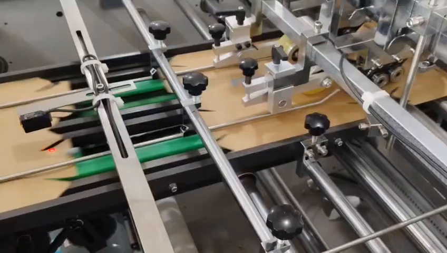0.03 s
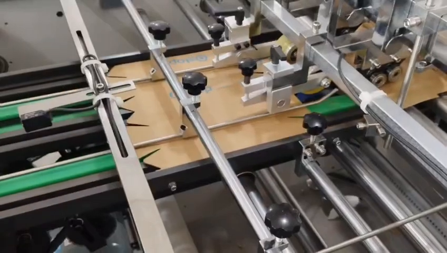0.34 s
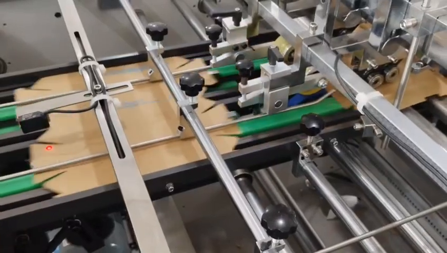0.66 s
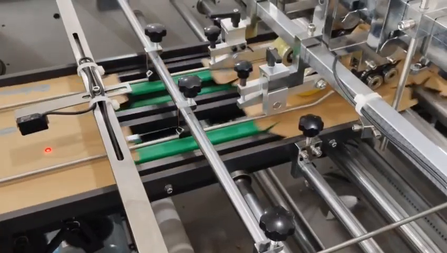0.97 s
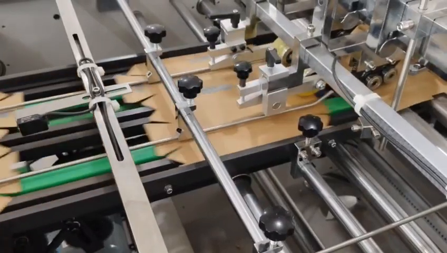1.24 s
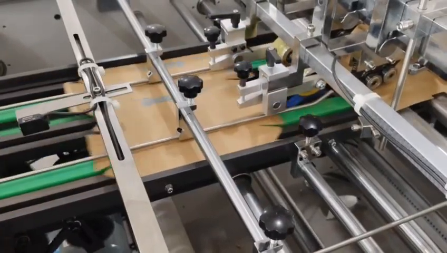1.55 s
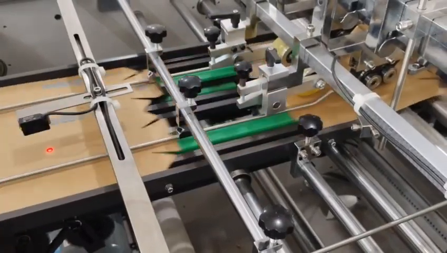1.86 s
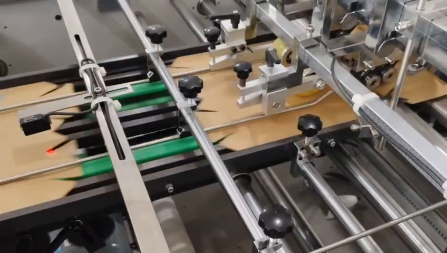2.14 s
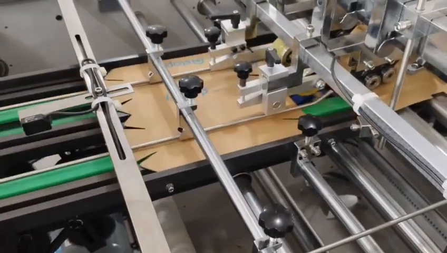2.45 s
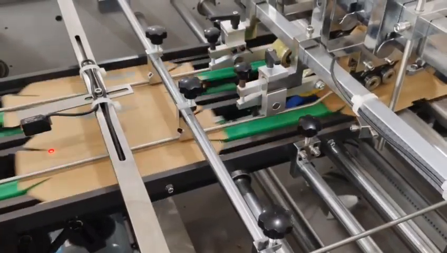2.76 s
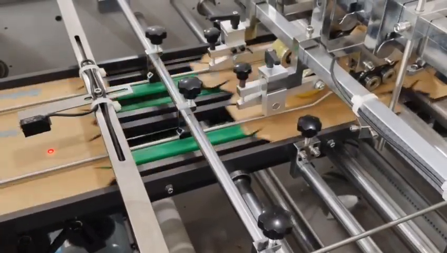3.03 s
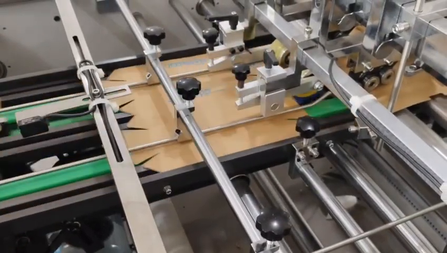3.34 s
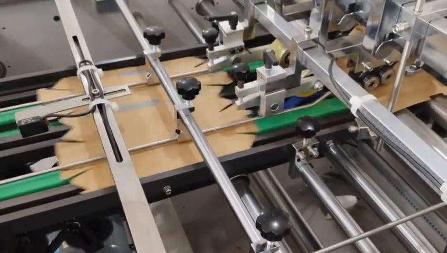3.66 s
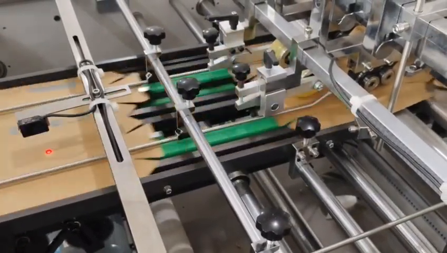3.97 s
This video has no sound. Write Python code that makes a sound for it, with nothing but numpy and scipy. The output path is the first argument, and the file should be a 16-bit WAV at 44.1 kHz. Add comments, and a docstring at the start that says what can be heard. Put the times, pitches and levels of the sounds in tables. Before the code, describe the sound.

Heard up close in a factory, a cardboard folding machine hums, rattles and whines. Four sheets pass a second apart, each with a hiss, a sharp slap, a scrape, then rumbling knocks and a snap, sometimes squeaking faintly.

```python
"""A folder-gluer pulls one cardboard blank a second along its belts, close by in a factory hall.
Each blank hisses along the guides, slaps the folding rails and scrapes clear. It rumbles through the
rollers with knocks, thumps and the odd stick-slip squeak, and its tail snaps off the feed belt.
Motors hum, belts and loose fittings rattle and the drive whines throughout."""
import sys
import numpy as np
from scipy import signal
from scipy.fft import rfft, irfft
from scipy.io import wavfile
from scipy.ndimage import uniform_filter1d

SR = 44100
rng = np.random.default_rng(int(sys.argv[2]) if len(sys.argv) > 2 else 0)


def output_pcm(signal):
    """Save a mono or channel-first signal as 16-bit PCM at the path in sys.argv[1].

    Samples are clipped to [-1, 1] before scaling.
    """
    pcm = np.clip(np.atleast_2d(signal).T, -1, 1) * 32767
    wavfile.write(sys.argv[1], SR, np.round(pcm).astype(np.int16))


N = 176400

# motor tones: pitch_hz, level_db
MOTOR_HUM = [(50, -45.5), (224, -44), (646, -49)]
# drive whine over time: time_s, level_db
WHINE_LEVELS = [(.25, -43), (.35, -41), (.45, -46), (1.0, -47), (1.7, -47), (2.2, -53.5), (3.0, -55),
                (4.0, -57)]
# buzzing fittings: centre_hz, width_hz, level_db
BUZZ_BANDS = [(2650, 340, -47.5), (4200, 340, -57)]
# rail and frame modes: pitch_hz, t60_s, level_db
FRAME_MODES = [(280, .12, -4), (646, .25, -8), (1360, .25, -8), (1980, .15, -4), (2163, .15, -6),
               (2293, .18, -5), (2618, .35, -1), (2720, .2, -2), (2805, .28, -3), (3335, .25, -9),
               (3757, .3, -7), (4060, .2, -5), (5502, .2, -17), (6534, .3, -14)]
# blank hits the folding rails: start_s, level_db, decay_s, guide_hz, guide_db
RAIL_SLAPS = [(.3738, -1.3, .013, 2200, -4), (1.3958, .2, .014, 2400, -5), (2.4167, .2, .016, 3950, 0),
              (3.4376, .3, .011, 3900, -1)]
# flaps flick around each slap: start_s, level_db
FLAP_FLICKS = [(.27, -24), (.31, -22), (.351, -14), (.3565, -7), (.383, -6), (.3994, -5.5), (.409, -9.5),
               (1.3775, -8.5), (1.389, -12), (1.413, -8), (2.400, -12), (2.409, -14), (2.431, -7),
               (2.449, -10), (2.4644, -11), (3.4146, -15), (3.423, -15), (3.442, -5), (3.473, -12)]
# card knocks under the rollers: start_s, level_db
ROLLER_KNOCKS = [(.648, -2), (.708, -3), (.808, 0), (.985, -8), (1.066, -4), (1.575, -6), (1.615, -7),
                 (1.677, 1), (1.722, -1), (1.828, -2), (1.875, -5), (1.998, -5), (2.678, 0), (2.73, -2),
                 (2.848, 0), (2.872, -4), (3.756, -3), (3.775, -4), (3.872, -3), (3.955, -6)]
# hollow thumps of sheet and belts: start_s, length_s, pitch_hz, level_db
SHEET_THUMPS = [(.77, .04, 235, -24.5), (.85, .03, 165, -32), (.95, .07, 50, -32), (1.675, .025, 370, -31),
                (1.815, .035, 200, -29), (2.76, .1, 222, -28), (3.825, .03, 235, -33)]
# tail leaves the feed belt: start_s, level_db
TAIL_SNAPS = [(.803, -2), (1.822, 1), (2.843, 0), (3.866, -2)]
# card squeaks on a guide: start_s, length_s, pitch_hz, level_db
GUIDE_SQUEAKS = [(1.715, .015, 4560, -41), (1.815, .012, 4560, -40), (2.668, .02, 2050, -35),
                 (2.725, .018, 2200, -35), (2.725, .06, 4549, -43.5), (2.785, .05, 4549, -41.5),
                 (3.747, .022, 2202, -27.5), (3.768, .016, 3758, -37), (3.79, .032, 4549, -35),
                 (3.835, .055, 4549, -43), (3.868, .016, 2900, -35)]

# spectra of the sources and the hall: frequency_hz, gain_db
BELT_SPECTRUM = [(20, -14), (33, -7), (48, -2), (65, -6), (95, -6), (135, -4), (220, -6), (330, -10.5),
                 (650, -13.5), (1000, -18), (1500, -20.5), (2200, -20), (2700, -20), (3200, -24),
                 (4100, -23.5), (5000, -26.5), (6800, -26.5), (8000, -30), (9800, -44), (12000, -33)]
HISS_SPECTRUM = [(250, -2), (900, 0), (1500, -3), (2400, -2), (4000, -2), (6500, 0), (8500, -3),
                 (10000, -8), (12000, -2)]
SCRAPE_SPECTRUM = [(200, -15), (800, -4), (1500, -4), (2600, 2), (3300, -4), (4800, -5), (6600, -2),
                   (8000, -10), (9500, -20), (12000, -12)]
RUB_SPECTRUM = [(200, -8), (600, 0), (1000, 0), (1400, -3), (2100, 1), (3100, -5), (4000, -2), (5000, -9),
                (7000, -17), (10000, -32)]
FLEX_SPECTRUM = [(100, -22), (220, -8), (350, -1), (650, 0), (950, -2), (1400, -10), (3000, -22),
                 (8000, -40)]
RUMBLE_SPECTRUM = [(30, -17), (70, -4), (110, -1), (230, 1.5), (400, -4), (700, -5.5), (1300, -12),
                   (2000, -14), (2800, -17), (4500, -25), (7000, -30), (12000, -42)]
SLAP_SPECTRUM = [(60, -25), (150, -14), (260, 0), (450, 1), (700, .5), (1000, -1.5), (1400, -4.5),
                 (2150, 2), (2750, 1), (3200, -5), (4100, -1), (5000, -11), (7000, -13), (9000, -32),
                 (12000, -31)]
KNOCK_SPECTRUM = [(100, -20), (300, -5), (700, -1), (1400, -3), (2000, 3), (2700, 0), (3100, -5), (4000, 0),
                  (5000, -10), (7000, -17), (10000, -32)]
SNAP_SPECTRUM = [(300, -12), (900, 0), (1500, 1), (2900, 0), (4500, -5), (7000, -4), (10000, -4),
                 (12000, -4)]
HALL_SPECTRUM = [(60, -14), (250, 0), (400, 2), (700, 1), (1000, -1), (1400, -3), (2400, 1.5), (3200, -6),
                 (4000, -5), (5000, -12), (7000, -14), (9000, -29), (12000, -25)]

# stages of a blank's passage: offset_from_slap_s, attack_s, hold_s, release_s, level_db
APPROACH_STAGE = (-.16, .06, .09, .03, -36.5)
FLEX_STAGE = (-.14, .11, .45, .075, -35)
SCRAPE_STAGE = (.003, .01, .02, .066, -24.5)
ROLL_STAGE = (.16, .2, .1, .16, -27.5)
FEED_STAGE = (.245, .03, .07, .11, -32.8)
RATTLE_STAGE = (.26, .02, .16, .1, -36.5)
EXIT_STAGE = (.35, .05, .03, .09, -38.5)

TIME_S = np.arange(N) / SR


def undb(db):
    return 10 ** (np.asarray(db) / 20)


def unit_rms(x):
    return x / np.sqrt(np.mean(x ** 2))


def unit_energy(x):
    return x / np.sqrt(np.sum(x ** 2))


def decay(t, t60_s):
    return np.exp(-np.log(1000) * t / t60_s)


def add(out, start_s, x):
    i = int(start_s * SR)
    out[i:i + len(x)] += x[:N - i]


def colour(x, spectrum, size=8192):
    """Minimum-phase filter through the spectrum's points."""
    hz, db = np.array(spectrum, float).T
    bins_hz = np.maximum(np.fft.rfftfreq(size, 1 / SR), 1)
    gain = undb(np.interp(np.log(bins_hz), np.log(hz), db))
    cepstrum = irfft(np.log(gain))
    cepstrum[1:size // 2] *= 2
    cepstrum[size // 2 + 1:] = 0
    return signal.fftconvolve(x, irfft(np.exp(rfft(cepstrum))))[:len(x)]


def drift(rate_hz):
    """Smooth random motion, rms 1."""
    span = max(int(SR / rate_hz), 2)
    steps = np.repeat(rng.standard_normal(N // span + 1), span)
    return unit_rms(uniform_filter1d(uniform_filter1d(steps, span), span)[:N])


def contact_noise(spectrum, rate_hz, spread_db):
    """Dense tiny contacts of uneven size, rms 1."""
    hits = rng.random(N) < rate_hz / SR
    sizes = undb(spread_db * rng.standard_normal(N))
    signs = np.sign(rng.standard_normal(N))
    return unit_rms(colour(hits * signs * sizes, spectrum))


def passage(stage):
    """Envelope of one stage, repeated for every blank."""
    offset_s, attack_s, hold_s, release_s, level_db = stage
    power = np.zeros(N)
    for slap_s, *_ in RAIL_SLAPS:
        age_s = TIME_S - slap_s - offset_s
        rise = np.clip(age_s / attack_s, 0, 1)
        fall = np.exp(-np.maximum(age_s - attack_s - hold_s, 0) / release_s)
        power += (rise * fall) ** 2
    return undb(level_db) * np.sqrt(power)


def frame_ring():
    """Impulse response of rails and frame, energy 1."""
    t = np.arange(SR // 2) / SR
    modes = (undb(db) / np.sqrt(t60_s) * decay(t, t60_s) * np.sin(2 * np.pi * (hz * t + rng.random()))
             for hz, t60_s, db in FRAME_MODES)
    return unit_energy(sum(modes))


def frame_drone(level_db):
    """Sustained ring of the rails under random excitation."""
    ring = signal.fftconvolve(rng.standard_normal(N), frame_ring(), mode="same")
    return undb(level_db) * unit_rms(ring)


def belts(level_db=-31.5):
    """Belts and bearings rattle in the frame."""
    running = contact_noise(BELT_SPECTRUM, rate_hz=6000, spread_db=3) + frame_drone(-16)
    return undb(level_db + .6 * drift(18)) * running


def running_tone(hz, wander_hz, flutter_db):
    """Sine with unsteady pitch and level, rms 1."""
    cycles = np.cumsum(hz + wander_hz * drift(30)) / SR
    return unit_rms(np.sin(2 * np.pi * cycles) * undb(flutter_db * drift(25)))


def motors():
    """Motors hum in a few wavering tones."""
    return sum(undb(db) * running_tone(hz, wander_hz=3, flutter_db=3) for hz, db in MOTOR_HUM)


def drive(whine_hz=8000, sideband_hz=7811, sideband_db=-11):
    """The drive whines: a rough high tone and a weaker sideband."""
    whine = running_tone(whine_hz, wander_hz=11, flutter_db=1.5)
    whine = unit_rms(whine * undb(3.5 * drift(90)))
    sideband = undb(sideband_db) * running_tone(sideband_hz, wander_hz=8, flutter_db=3)
    level_db = np.interp(TIME_S, *np.array(WHINE_LEVELS).T)
    return undb(level_db) * (whine + sideband)


def chink(hz, t60_s):
    """One short metallic ring, energy 1."""
    t = np.arange(SR // 4) / SR
    return unit_energy(np.sin(2 * np.pi * min(hz, SR / 4) * t) * decay(t, t60_s))


def rattle(count, spread_db, centre_hz=2100, median_t60_s=.065):
    """Loose parts chink at random, the higher ones softer; rms 1."""
    out = np.zeros(N)
    starts_s = rng.random(count) * (N - 1) / SR
    for start_s, (octaves, stretch, size) in zip(starts_s, rng.uniform(-1, 1, (count, 3))):
        gain = undb(spread_db * size) / 2 ** (octaves / 2)
        add(out, start_s, gain * chink(centre_hz * 2 ** octaves, median_t60_s * 2 ** stretch))
    return unit_rms(out)


def fittings(idle_db=-43.5):
    """Metal fittings buzz and rattle; each passing blank adds harder rattling."""
    buzz = np.zeros(N)
    for hz, width_hz, db in BUZZ_BANDS:
        baseband = drift(width_hz) + 1j * drift(width_hz)
        band = np.real(baseband * np.exp(2j * np.pi * hz * TIME_S))
        buzz += undb(db) * unit_rms(band * undb(2 * drift(12)))
    idle = undb(idle_db) * rattle(count=600, spread_db=6)
    loaded = passage(RATTLE_STAGE) * rattle(count=700, spread_db=7)
    return buzz + idle + loaded


def sliding():
    """Card hisses along the guides, scrapes off the rails and rubs into the rollers."""
    hiss = contact_noise(HISS_SPECTRUM, rate_hz=7000, spread_db=3) * undb(1.2 * drift(50))
    hiss *= passage(APPROACH_STAGE) + passage(EXIT_STAGE)
    scrape = contact_noise(SCRAPE_SPECTRUM, rate_hz=4000, spread_db=3) + frame_drone(-7)
    rub = contact_noise(RUB_SPECTRUM, rate_hz=2000, spread_db=4) + frame_drone(-8)
    rub *= undb(1.5 * drift(45))
    return hiss + scrape * passage(SCRAPE_STAGE) + rub * passage(FEED_STAGE)


def rollers():
    """The blank flexes and rumbles between the rollers."""
    rumble = contact_noise(RUMBLE_SPECTRUM, rate_hz=4000, spread_db=2) * undb(.7 * drift(25))
    flex = contact_noise(FLEX_SPECTRUM, rate_hz=1500, spread_db=3)
    return rumble * passage(ROLL_STAGE) + flex * passage(FLEX_STAGE)


def buckle(decay_s, attack_s):
    """Force of card buckling against metal, energy 1."""
    t = np.arange(SR // 8) / SR
    envelope = (1 - np.exp(-t / attack_s)) * np.exp(-t / decay_s)
    return unit_energy(np.sign(rng.standard_normal(len(t))) * envelope)


def struck(force, spectrum, ring_db, hall_db, hall_t60_s=.85):
    """Blows heard as a crack, the ring of the rails and the hall's tail."""
    t = np.arange(SR) / SR
    crack = unit_energy(colour(signal.unit_impulse(SR), spectrum))
    echoes = rng.standard_normal(SR) * (1 - np.exp(-t / .012)) * decay(t, hall_t60_s)
    response = crack + undb(hall_db) * unit_energy(colour(echoes, HALL_SPECTRUM))
    add(response, 0, undb(ring_db) * frame_ring())
    return signal.fftconvolve(force, response)[:N]


def impacts(rail_gain_db=14.6, guide_gain_db=5, roller_gain_db=-.5):
    """Card flicks and slaps the rails and knocks in the rollers; slaps ring a guide's close modes."""
    rail_force, roller_force, guide_ring = np.zeros((3, N))
    for start_s, db, decay_s, guide_hz, guide_db in RAIL_SLAPS:
        add(rail_force, start_s, undb(rail_gain_db + db) * buckle(decay_s, attack_s=.001))
        modes_hz = guide_hz * (1 + .06 * rng.standard_normal(6))
        cluster = sum(rng.choice([-1, 1]) * chink(hz, t60_s=.07) for hz in modes_hz)
        add(guide_ring, start_s, undb(guide_gain_db + guide_db) * unit_energy(cluster))
    for start_s, db in FLAP_FLICKS:
        add(rail_force, start_s, undb(rail_gain_db + db) * buckle(decay_s=.009, attack_s=.004))
    for start_s, db in ROLLER_KNOCKS:
        add(roller_force, start_s, undb(roller_gain_db + db) * buckle(decay_s=.012, attack_s=.004))
    slaps = struck(rail_force, SLAP_SPECTRUM, ring_db=-9, hall_db=-6.5)
    knocks = struck(roller_force, KNOCK_SPECTRUM, ring_db=-6, hall_db=-8)
    return guide_ring + slaps + knocks


def brief_tones(events, attack_s, release_s, waver_hz, rough_db):
    """Unsteady tones that swell, hold and die away."""
    out = np.zeros(N)
    detune_hz = waver_hz * drift(160)
    roughness = undb(rough_db * drift(200))
    for start_s, length_s, hz, db in events:
        cycles = np.cumsum(hz + detune_hz) / SR + rng.random()
        tone = unit_rms(np.sin(2 * np.pi * cycles) * roughness)
        rise = np.clip((TIME_S - start_s) / attack_s, 0, 1)
        fall = np.exp(-np.maximum(TIME_S - start_s - length_s, 0) / release_s)
        out += undb(db) * tone * rise * fall
    return out


def thumps():
    """Sheet and belts thump hollowly."""
    return brief_tones(SHEET_THUMPS, attack_s=.02, release_s=.022, waver_hz=32, rough_db=3)


def snaps(attack_s=.002, decay_s=.022):
    """A bright crack as each blank's tail comes off the feed belt."""
    out, t = np.zeros(N), np.arange(SR // 4) / SR
    envelope = (1 - np.exp(-t / attack_s)) * np.exp(-t / decay_s)
    for start_s, db in TAIL_SNAPS:
        burst = rng.standard_normal(len(t)) * envelope
        add(out, start_s, undb(db) * unit_energy(colour(burst, SNAP_SPECTRUM)))
    return out


def squeaks():
    """Scratchy stick-slip of card on the guides."""
    return brief_tones(GUIDE_SQUEAKS, attack_s=.012, release_s=.024, waver_hz=18, rough_db=2.5)


def scene():
    """The running machine and its blanks, mono."""
    machine = belts() + motors() + drive() + fittings()
    blanks = impacts() + snaps() + sliding() + rollers() + thumps() + squeaks()
    return (machine + blanks)[None]


def record(dry, start_s=.229, fade_s=.002, cutoff_hz=12300):
    """The sound cuts in abruptly; a steep low-pass removes the top."""
    gate = np.clip((TIME_S - start_s) / fade_s, 0, 1)
    lowpass = signal.ellip(10, .2, 80, cutoff_hz, fs=SR, output="sos")
    return signal.sosfilt(lowpass, dry * gate)


dry = scene()
out = record(dry)
output_pcm(out)
```